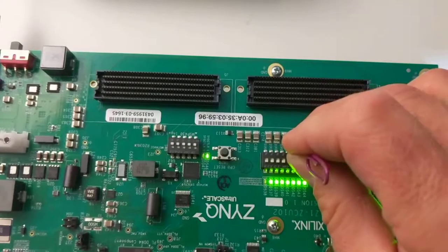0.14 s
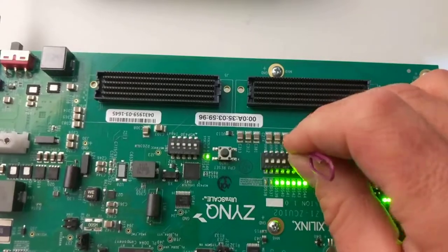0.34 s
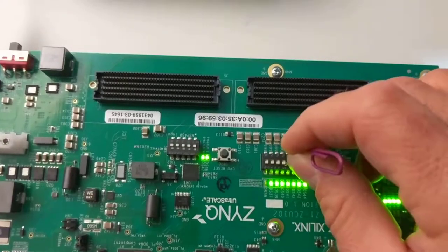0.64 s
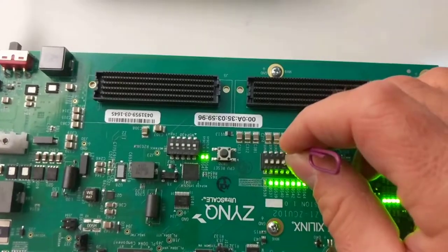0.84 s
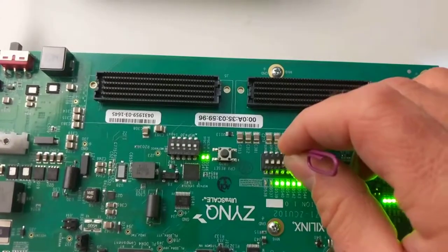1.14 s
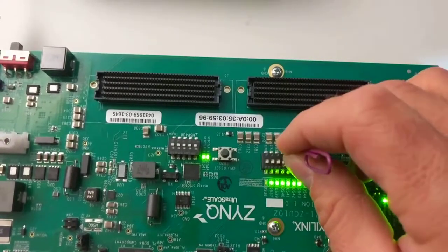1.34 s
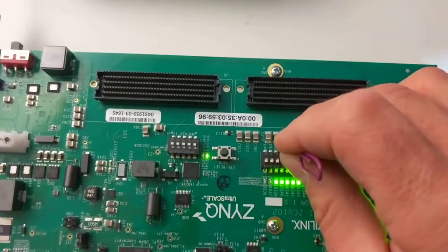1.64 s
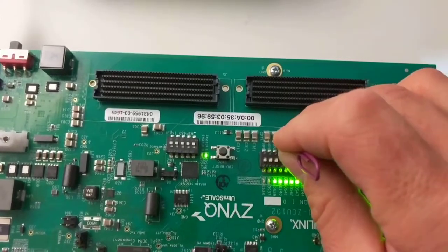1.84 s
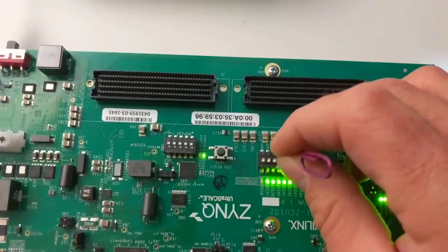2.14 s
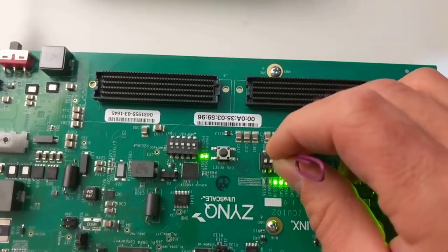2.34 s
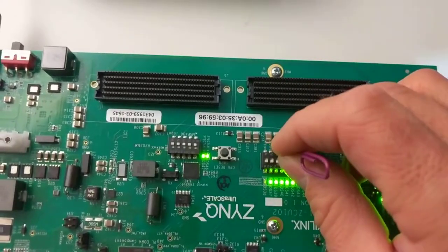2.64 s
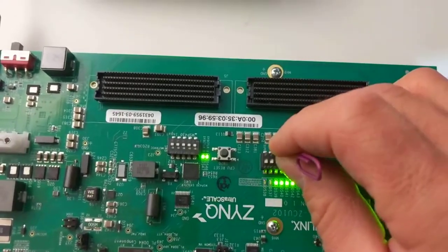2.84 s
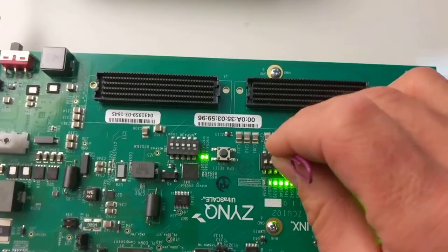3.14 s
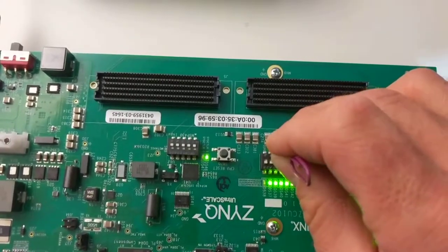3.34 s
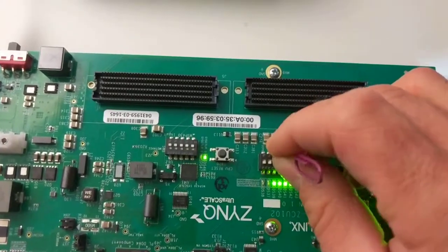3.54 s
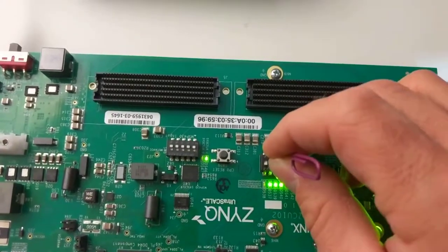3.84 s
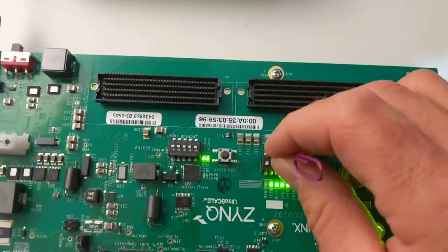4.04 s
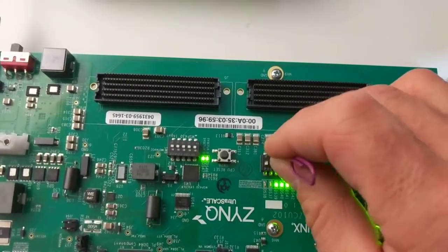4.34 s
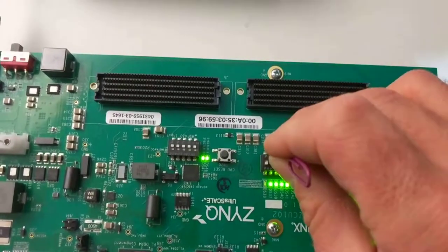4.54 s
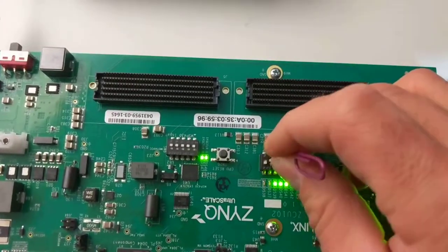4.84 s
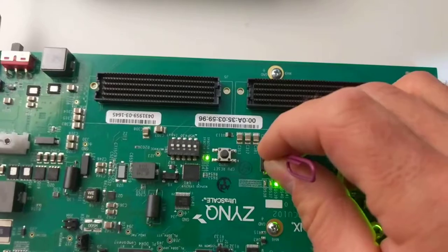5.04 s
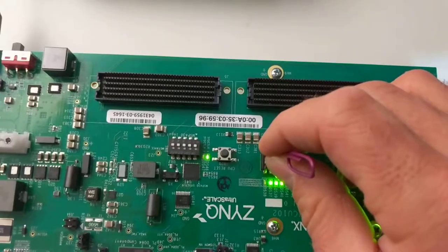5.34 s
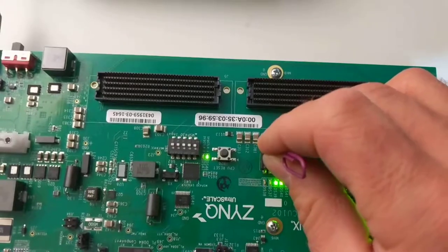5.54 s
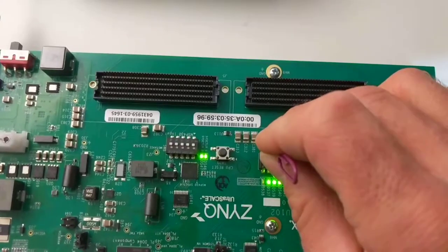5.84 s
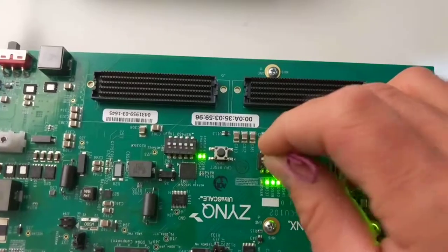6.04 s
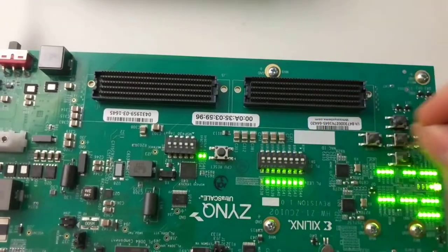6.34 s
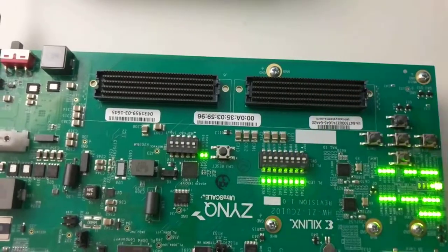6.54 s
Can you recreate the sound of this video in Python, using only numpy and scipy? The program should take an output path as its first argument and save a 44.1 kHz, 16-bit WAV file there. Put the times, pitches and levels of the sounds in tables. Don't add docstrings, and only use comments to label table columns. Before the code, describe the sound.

Five tiny slide switches on a circuit board snap over one by one, sharp and dry, above the steady faint hiss of a small fan.

```python
import sys
import numpy as np
from scipy import signal
from scipy.fft import rfft, irfft, next_fast_len
from scipy.io import wavfile

SR = 44100
rng = np.random.default_rng(int(sys.argv[2]) if len(sys.argv) > 2 else 0)


def dump(signal):
    limited = np.clip(np.atleast_2d(signal).T, -1, 1)
    pcm = np.round(limited * 32767).astype(np.int16)
    wavfile.write(sys.argv[1], SR, pcm)


def level_to_linear(level):
    exponent = np.asarray(level, float) / 20
    return 10 ** exponent


N = 295029

SNAP_TIMES = [
    .20180,
    1.82885,
    3.32915,
    4.59443,
    5.82783,
]
# peak level/dB, board knock level/dB, sharpness/dB per octave
SNAPS = [
    (-14.5, -31.5, 1.5),
    (-14, -29, 1),
    (-18.5, -26.5, 0.3),
    (-15, -30.5, 0.5),
    (-15.5, -29.5, -1.2),
]
# f/Hz, level/dB, time to fade by 60 dB/s
HOUSING = [(2930, -17, .012), (3270, -19, .012), (3600, -18, .012), (4150, -22, .012), (4740, -17, .012),
           (5200, -20, .02), (5415, -19, .015), (5745, -16, .014), (6045, -16, .018), (6756, -12, .014),
           (7250, -10, .016), (7685, -10, .02), (7990, -7, .02), (8345, -17, .03)]
# f/Hz, level/dB, time to fade by 60 dB/s
SLIDER = [(8820, -14, .02), (9375, -11, .025), (9780, -3, .022), (10000, -12, .025), (10530, -1.5, .016),
          (10860, -7, .02), (11360, -10, .018), (11880, -11, .014), (12450, -10, .014), (13100, -12, .016),
          (13640, -14, .014), (14060, -16, .016), (14810, -12, .013), (15280, -15, .012)]
# f/Hz, level/dB, time to fade by 60 dB/s
BOARD = [(560, -20, .02), (720, -6, .03), (815, -10, .025), (905, -5, .04), (1045, 1, .025),
         (1355, 0, .021), (1450, -12, .02), (1875, -11, .05), (1985, -1, .02)]
# f/Hz, level/dB, time to fade by 60 dB/s
BOARD_RING = [(843, -22, .33), (862, -23.5, .3)]
# f/Hz, level/dB, time to fade by 60 dB/s
DESK = [(56.7, -4, 0.2), (90, -3.5, 0.11), (168, -2.5, 0.15), (284, -14, 0.14), (300, -0.5, 0.17),
        (386.7, 0, 0.18), (514, -6, 0.15)]
# centre f/Hz, level/dB, time to fade by 60 dB/s
TAIL = [(235, -14.5, 0.21), (855, -9, 0.14), (1530, -4.5, 0.048), (3700, -21, .05), (5500, -19, 0.065),
        (7300, -24.5, 0.12), (10300, -30, 0.2), (13300, -25, 0.062)]
# t/s, level/dB, f/Hz
BUMPS = [(1.259, -56, 60), (2.36, -59, 60), (3.788, -53, 65), (5.001, -50, 65), (6.039, -56, 70),
         (6.421, -46.5, 133), (6.484, -55, 90), (6.522, -44, 294), (6.55, -53, 110), (6.601, -51, 131),
         (6.652, -53, 100)]
# t/s, extra path of its echo/cm
HAND = [
    (0, 9.4),
    (.45, 9.7),
    (1.1, 9.8),
    (1.5, 9.2),
    (6.0, 9.0),
    (6.15, 9.4),
    (6.25, 11.2),
    (6.36, 13.2),
    (6.45, 14.2),
    (6.69, 15.5),
]
# f/Hz, level/dB per Hz
AIR = [(18, -42), (30, -15), (59, -12), (160, -12.5), (192, -19), (219, -18.5), (351, -16), (468, -12),
       (877, -8.5), (949, -10), (1030, -9), (1920, -2), (4930, -11.5), (5620, -14.5), (15600, -26.5)]
# centre f/Hz, width/Hz, level/dB
HISS_PEAKS = [(60, 14, 6), (1371, 190, 7), (1908, 260, 4.5), (2470, 67, 3), (3025, 52, 6), (4320, 940, 3.5),
              (4830, 95, 4.5), (5120, 89, 7.5), (5800, 350, 0), (7000, 190, -2), (7550, 430, 5), (8320, 190, 1),
              (8810, 170, 6.5), (10160, 250, -2.5), (4540, 37, 0.5), (11000, 400, 1), (12400, 870, 2.5),
              (15200, 380, 0)]
# multiple of its turning rate, rms level/dB
ROTOR = [(1.0, -74), (2.5, -80), (5.0, -66.5), (12.0, -67.5), (16.0, -71), (20.0, -69.5)]
# t/s, f/Hz of the 20th multiple of its turning rate
ROTOR_SPEED = [(0, 3849), (1.2, 3849), (2.6, 3855), (4.7, 3849), (6.69, 3858)]
# multiple of its base pitch, rms level/dB
FAR_FAN = [(1.0, -72.5), (10.0, -85), (11.0, -98), (15.0, -96), (16.0, -93)]

CRACK_DB = 1.5
REBOUND_S, REBOUND_DB = .00115, -6
STAGGER_S = .0009
EVEN_PUSH_DB = -13
BOARD_TILT_DB_PER_DB = 0.23
RING_ON_DB = 4
THUMP_DB = -48
REST_CM = 9.6
RUSTLE_DB, RUSTLE_DB_PER_CM = -79, 2.5
AIR_DB, HISS_CUTOFF_HZ = -49.5, 15750
SOUND_CM_PER_S = 34300
ECHO_SHARE, ECHO_FADES_CM, ECHO_GONE_CM, ECHO_WIDTH_HZ = .62, 12.5, 14.5, 520
SHADE_DB, SHADE_LIFT_DB_PER_CM = -75, 0.7
FAR_FAN_HZ = 831


def switches():
    snap_db, knock_db, sharp_db = np.transpose(SNAPS)
    s = np.array(SNAP_TIMES)
    extra_push_db = knock_db - snap_db - EVEN_PUSH_DB
    out = crack(s, snap_db) + housing(s, snap_db, sharp_db)
    out = out + board(s, knock_db, extra_push_db) + desk(s)
    return out + scattered_tail(s, snap_db, knock_db)


def crack(s, snap_db):
    hit = strikes(s + 8 / SR, level_to_linear(snap_db + CRACK_DB))
    rebound = strikes(s + REBOUND_S, level_to_linear(snap_db + CRACK_DB + REBOUND_DB))
    return band(hit + rebound, 7500, 16800)


def housing(s, snap_db, sharp_db):
    slider = body(SLIDER, s + 4 / SR, snap_db - 5.5, 0.75, sharp_db, pivot_hz=9000, node_hz=8000)
    plastic = body(HOUSING, s, snap_db - 5.0, 0.74, sharp_db, pivot_hz=9000, stagger_s=STAGGER_S)
    return slider + plastic


def board(s, knock_db, extra_push_db):
    tilt_db = BOARD_TILT_DB_PER_DB * extra_push_db
    knock = body(BOARD, s - 3 / SR, knock_db + 1.5, 1.4, tilt_db, pivot_hz=1000, node_hz=760)
    long_ring = body(BOARD_RING, s, knock_db + RING_ON_DB + .5 * extra_push_db, 0.74, node_hz=760)
    return band(band(knock + long_ring, 480, 2500), 200, 2900)


def desk(s):
    return soften(body(DESK, s + 0.0036, THUMP_DB, spread_db=4.0), 290)


def scattered_tail(s, snap_db, knock_db):
    age = np.arange(SR // 4) / SR
    build_up = np.minimum(age / .004, 1)
    out = 0
    for hz, db, t60 in TAIL:
        fading = rng.standard_normal(len(age)) * level_to_linear(db - 60 * age / t60)
        scatter = band(fading, hz / 1.25, hz * 1.25) * build_up
        source_db = knock_db - EVEN_PUSH_DB if 500 < hz < 2500 else snap_db
        out = out + signal.fftconvolve(strikes(s, level_to_linear(source_db)), scatter)[:N]
    return out


def sleeve():
    bumps = soften(sum(ring(strikes([s], level_to_linear(db)), hz, 6.1 / hz) for s, db, hz in BUMPS), 590)
    rustle = band(rng.standard_normal(N), 82, 356)
    detour_cm, = in_time(HAND)
    rustle_db = RUSTLE_DB + RUSTLE_DB_PER_CM * (detour_cm - REST_CM)
    return bumps + level_to_linear(rustle_db + 1.5 * drift(31)) * rustle / rustle.std()


def fan_air():
    air = shaped_hiss()
    detour_cm, = in_time(HAND)
    nearness = np.interp(detour_cm, [ECHO_FADES_CM, ECHO_GONE_CM], [1, 0])
    share = np.clip(ECHO_SHARE * nearness, 0, 1)
    for turns, depth in ((1.5, 1), (2.5, .45)):
        air = air - depth * share * moving_band(air, turns * SOUND_CM_PER_S / detour_cm, ECHO_WIDTH_HZ)
    lift_db = SHADE_DB + SHADE_LIFT_DB_PER_CM * (detour_cm - REST_CM)
    unshaded = band(rng.standard_normal(N), 5350, 5560)
    return air + level_to_linear(lift_db) * unshaded / unshaded.std()


def shaped_hiss():
    size = next_fast_len(N)
    hz = np.maximum(np.arange(size // 2 + 1) * SR / size, 1)
    air_hz, air_db = np.transpose(AIR)
    db = np.interp(np.log(hz), np.log(air_hz), air_db)
    for centre_hz, width_hz, gain_db in HISS_PEAKS:
        db = db + gain_db / (1 + ((hz - centre_hz) / width_hz * 2) ** 2)
    spectrum = rfft(rng.standard_normal(size)) * level_to_linear(db) * (hz < HISS_CUTOFF_HZ)
    air = irfft(spectrum, size)[:N]
    return level_to_linear(AIR_DB + 0.42 * drift(0.37)) * air / air.std()


def fan_tones():
    speed_hz = in_time(ROTOR_SPEED)[0] / 20 * (1 + .0012 * drift(2))
    turn = 2 * np.pi * np.cumsum(speed_hz) / SR
    far_turn = 2 * np.pi * np.cumsum(FAR_FAN_HZ + 1.43 * drift(1.16)) / SR
    near = sum(level_to_linear(db + 0.15 * drift(1.6)) * np.sin(k * turn + k * k) for k, db in ROTOR)
    far = sum(level_to_linear(db + 2.0 * drift(3.0)) * np.sin(k * far_turn) for k, db in FAR_FAN)
    return np.sqrt(2) * (near + far)


def body(modes, times, level_db, spread_db, tilt_db=0, pivot_hz=1, node_hz=None, stagger_s=0):
    sense = rng.choice([-1, 1], len(modes))
    if node_hz:
        sense = np.sign(np.array(modes)[:, 0] - node_hz)
    luck = rng.standard_normal((len(times), len(modes)))
    late = stagger_s * rng.random(len(modes))
    out = 0
    for k, (hz, db, t60) in enumerate(modes):
        blow_db = level_db + db + spread_db * luck[:, k] + tilt_db * np.log2(hz / pivot_hz)
        out = out + sense[k] * ring(strikes(times + late[k], level_to_linear(blow_db)), hz, t60)
    return out


def strikes(times, gains):
    out = np.full(N, 1e-18)
    out[np.round(np.asarray(times) * SR).astype(int)] = gains
    return out


def ring(clicks, hz, t60):
    r, w = level_to_linear(-60 / (t60 * SR)), 2 * np.pi * hz / SR
    return signal.lfilter([0, np.sin(w)], [1, -2 * r * np.cos(w), r * r], clicks)


def soften(x, hz):
    r = np.exp(-2 * np.pi * hz / SR)
    return signal.lfilter([(1 - r) ** 2], [1, -2 * r, r * r], x)


def drift(rate_hz):
    slow = soften(rng.standard_normal(N + SR), rate_hz)[SR:]
    return slow / slow.std()


def band(x, low_hz, high_hz):
    edges = [low_hz, min(high_hz, .45 * SR)]
    return signal.sosfilt(signal.butter(2, edges, "band", fs=SR, output="sos"), x)


def in_time(rows):
    s, *columns = np.transpose(rows)
    return [np.interp(np.arange(N) / SR, s, c) for c in columns]


def moving_band(x, hz, width_hz):
    out, state = np.zeros(N), np.zeros(2)
    r = np.exp(-np.pi * width_hz / SR)
    for i in range(0, N, 128):
        poles = [1, -2 * r * np.cos(2 * np.pi * hz[i] / SR), r * r]
        zeros = [(1 - r * r) / 2, 0, (r * r - 1) / 2]
        out[i:i + 128], state = signal.lfilter(zeros, poles, x[i:i + 128], zi=state)
    return out


def scene():
    return np.tile(switches() + sleeve() + fan_air() + fan_tones(), (2, 1))


def band_limit(x):
    return signal.sosfilt(signal.butter(12, 16990, fs=SR, output="sos"), x)


def record(dry):
    mix = signal.sosfilt(signal.butter(2, 45, "high", fs=SR, output="sos"), dry)
    mix = signal.sosfilt(signal.cheby2(8, 60, 17500, fs=SR, output="sos"), mix)
    return band_limit(mix)


dry = scene()
out = record(dry)
dump(out)
```